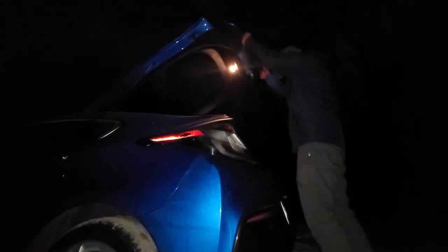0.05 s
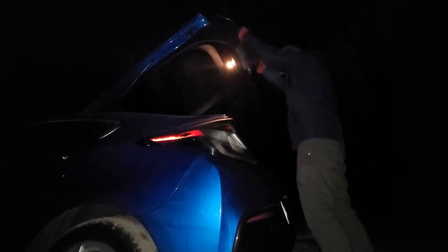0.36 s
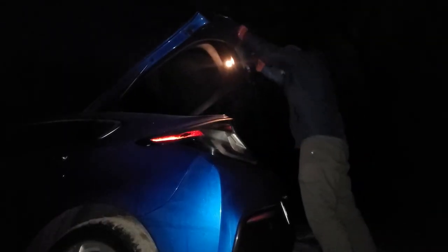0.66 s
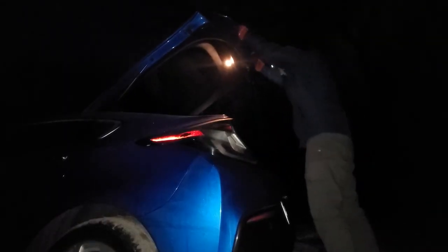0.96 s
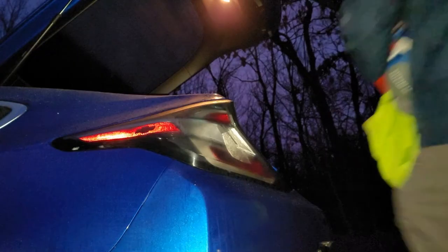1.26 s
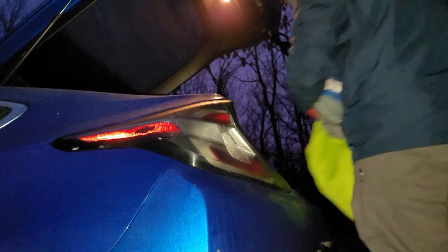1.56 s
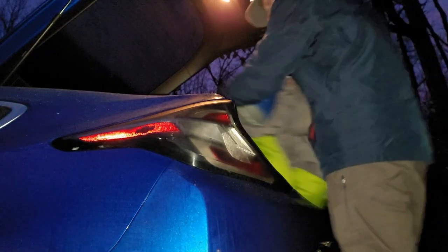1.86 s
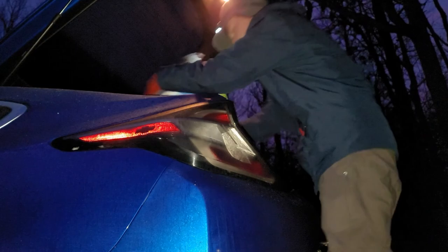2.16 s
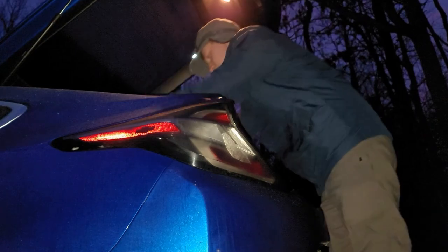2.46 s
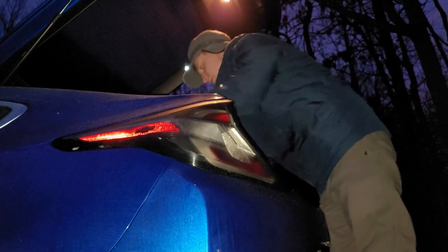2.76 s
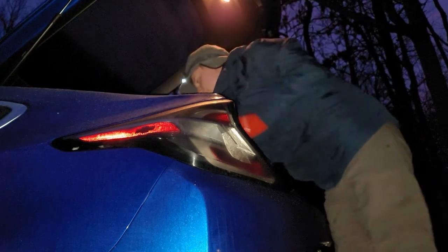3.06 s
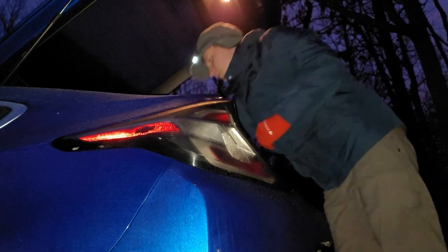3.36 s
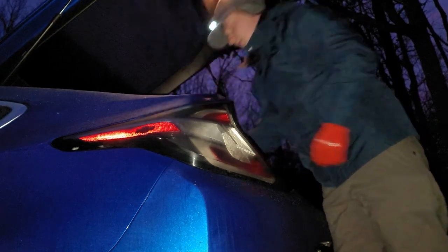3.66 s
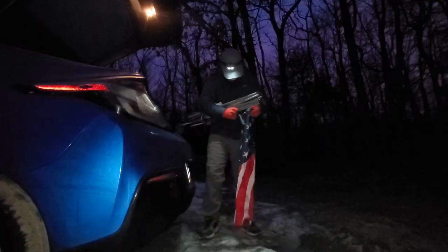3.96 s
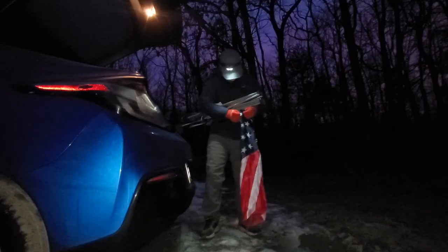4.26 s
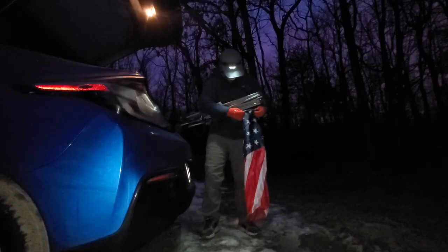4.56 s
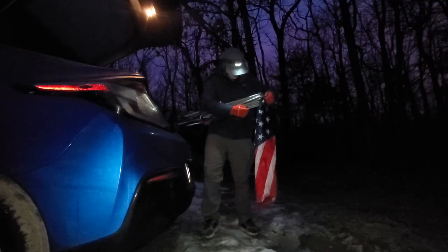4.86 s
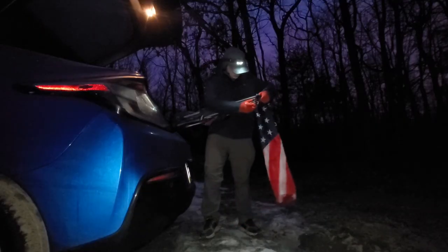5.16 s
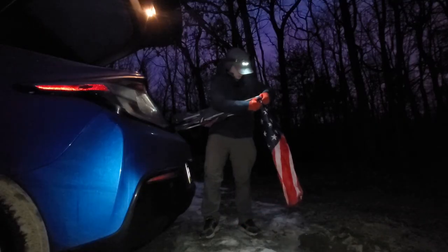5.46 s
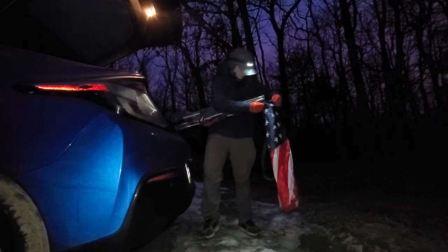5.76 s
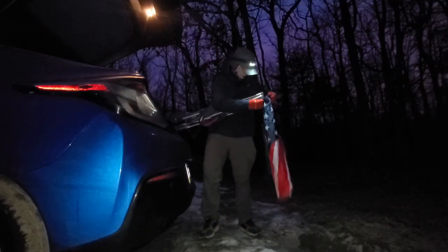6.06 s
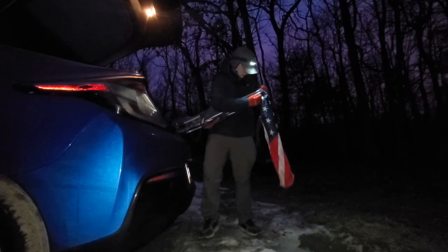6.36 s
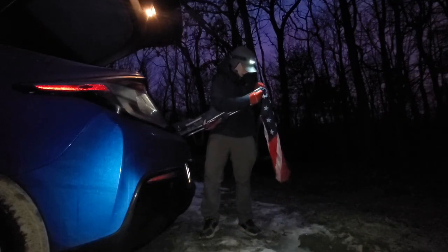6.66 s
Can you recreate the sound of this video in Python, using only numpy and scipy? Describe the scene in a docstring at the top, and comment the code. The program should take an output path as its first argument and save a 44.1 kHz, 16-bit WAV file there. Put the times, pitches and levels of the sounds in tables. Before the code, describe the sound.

After a light breeze on the microphone, close jacket rustling and knocking gear give way to quieter swishes of a flag being rolled.

```python
"""At the open boot of a car on a still, cold night; three scenes parted by short silences.
First, a light breeze on the microphone ports over a distant hush. Then, close by, a stiff jacket
crinkles and buckles, gear knocks and a nylon flag slides over the boot floor. Last, a few steps away,
the flag is rolled up in swishing strokes that the car's side reflects; a glove zips once over the
weave and an eddy thumps the right port."""
import sys
import numpy as np
from scipy import signal
from scipy.fft import rfft, irfft, next_fast_len
from scipy.io import wavfile
from scipy.ndimage import uniform_filter1d, map_coordinates

SR = 44100
rng = np.random.default_rng(int(sys.argv[2]) if len(sys.argv) > 2 else 0)


def pcm_store(signal):
    """Save signal as 16-bit PCM."""
    levels = np.round(np.clip(np.atleast_2d(signal), -1, 1) * 32767)
    wavfile.write(sys.argv[1], SR, levels.astype(np.int16).T)


N = 304290

# background spectra: f/Hz, relative level/dB
HUSH_SPECTRUM = [(40, 10), (200, 4.5), (330, -1), (520, -1.5), (950, -11.5), (1250, -8.5), (1700, -11.5),
                 (2300, -18), (4200, -13), (4800, -24), (9000, -29)]
HISS_SPECTRUM = [(1100, 12.5), (4150, -1), (4750, -1.5), (7400, 1), (8450, 6), (9100, -33), (11400, 1.5),
                 (14400, -8.5)]
RUMBLE_SPECTRUM = [(15, -6.5), (45, -1.5), (70, 2), (110, -5.5), (170, -8.5), (280, -25.5), (600, -40),
                   (2000, -100)]
EDDY_SPECTRUM = [(15, -6.5), (28, -1.5), (48, 3), (70, -1.5), (110, -14.5), (170, -25.5), (300, -45.5),
                 (1000, -100)]
# distant hush: t/s, level/dB
HUSH_LEVELS = [(0, -60), (1.1, -67.5), (1.3, -60), (3.2, -64), (4.4, -63.5), (6.9, -63)]
# wind on the ports: peak t/s, level/dB, rise and fall/s
BREEZE_GUSTS = [(.1, -45, 0.22), (.75, -40, 0.53), (1.25, -42, 0.066), (2.12, -56.5, 0.62),
                (4.56, -60.5, 0.18), (6.07, -57, 0.25), (6.58, -58, 0.28)]
# person's bearing: t/s, right port lead/ms
PORT_LEADS = [(1.22, .3), (1.38, .38), (1.5, .18), (3.1, .13), (3.8, .26), (4.6, .04), (5.3, -.02)]
# jacket and flag rustle spectra, including the recorder's treble steps: f/Hz, relative level/dB
JACKET_RUSTLE = [(40, -20), (90, -13), (340, -2.5), (780, -2.5), (1350, -2), (2450, -4), (4150, -6),
                 (4850, -12.5), (8100, -19), (9400, -24.5), (14400, -25.5)]
FLAG_RUSTLE = [(160, -15), (360, -14), (560, 1), (880, -4), (1230, -3), (1650, -2), (2550, -4.5),
               (4150, -5.5), (4850, -12), (8300, -11), (9400, -19), (14400, -16)]
# arm movements; flag pulls: peak t/s, relative level/dB, rise/s, fall/s, treble gain/dB
ARM_STROKES = [(1.223, -32.5, 0.013, 0.034, 9), (1.257, -20.5, 0.027, 0.049, -4.5),
               (1.322, -41, 0.027, 0.12, -4), (1.397, -27, 0.12, 0.045, 2.5),
               (1.47, -42.5, 0.078, 0.16, 4.5), (1.66, -39.5, 0.08, .1, 5.5),
               (1.765, -39, 0.053, 0.082, 7.5), (1.89, -28, 0.026, 0.097, 0.5),
               (1.928, -22.5, 0.045, 0.039, -9), (2.08, -35.5, .07, 0.12, 2.5),
               (2.16, -37, 0.043, 0.16, 3.5), (2.27, -41, 0.12, 0.22, -0.5), (2.47, -40, 0.3, 0.087, 0.5),
               (3.16, -48, 0.16, 0.16, 3), (3.828, -37.5, 0.056, 0.084, -7)]
FLAG_PULLS = [(2.4, -51.5, 0.28, .15, 11.5), (2.92, -52.5, 0.27, 0.074, 1), (3.05, -47, 0.14, 0.17, 3.5),
              (4.09, -60, 0.2, 0.24, 3.5), (4.255, -51, .1, 0.085, 1.5), (4.49, -53.5, 0.15, 0.14, 4),
              (4.675, -46.5, 0.11, 0.086, 3.5), (4.805, -47, 0.15, 0.064, 3.5),
              (5.093, -40.5, 0.077, 0.079, -2), (5.24, -39, 0.09, 0.13, 2.5), (5.32, -39.5, .07, .15, 1),
              (5.47, -51.5, 0.12, 0.082, 9), (5.67, -60, 0.15, 0.17, 3.5), (6.17, -58, 0.11, 0.11, 2),
              (6.3, -55, 0.2, 0.12, -9), (6.565, -48.5, 0.043, 0.049, -1), (6.755, -52, 0.0097, 0.03, 1.5),
              (6.86, -56.5, 0.096, .12, 2)]
# buckling folds: t/s, relative level/dB, ring f/Hz, treble gain/dB
FOLD_SNAPS = [(1.218, 0, 370, 2), (1.2543, -2, 230, 6), (1.262, -4, 480, 10), (1.289, -7, 390, 1),
              (1.313, -2.5, 1610, -7), (1.3627, 2, 1600, 8.5), (1.366, 0, 597, 7.5), (1.506, -6.5, 390, 4),
              (1.58, -17, 483, -8), (1.623, -5.5, 420, 0), (1.653, -15, 740, 8.5),
              (1.7431, -10.5, 2180, 9.5), (1.8625, -4, 2160, 0.5), (1.875, -3, 2440, -3.5),
              (1.956, -4, 2880, -2), (2.014, -20, 980, -7), (2.048, -16, 2200, -4), (2.102, -10, 370, 2),
              (2.1368, 0.5, 383, -1.5), (2.302, -16.5, 3070, 9.5), (2.3432, -12.5, 350, 5),
              (2.508, -14.5, 354, 7), (2.5912, -27, 613, 14), (2.794, -42, 3380, 21.5),
              (2.988, -40, 2500, 27), (3.104, -18, 1200, 7), (3.144, -15.5, 394, 0), (3.204, -20, 496, -2),
              (3.2543, -29.5, 2460, 7), (3.7877, -6, 417, 1.5), (3.814, -10.5, 450, -10),
              (4.814, -18, 493, -2), (6.555, -29, 3120, 0.5)]
# knocking gear: t/s, relative level/dB, ring f/Hz, rattle t60/s
GEAR_KNOCKS = [(1.249, 12, 1420, 0.027), (1.2554, 10.5, 516, 0.0096), (1.402, -0.5, 654, 0.0068),
               (1.9128, 6, 1360, 0.0033), (1.92, 6.5, 1420, 0.0061), (1.946, -1, 1200, 0.0063),
               (3.213, -18, 1150, 0.014), (3.784, 0.5, 720, 0.025), (3.824, -6, 1040, 0.024),
               (3.843, 1.5, 700, 0.018), (5.3734, -6.5, 1270, 0.014), (5.444, -8.5, 1093, 0.013)]
# gaps between scenes: start t/s, end t/s
SILENCES = [(1.134, 1.206), (3.882, 3.95)]


def amp(db):
    """Decibels to gain."""
    return 10 ** (np.asarray(db) / 20)


def unit(x):
    """Scale to rms 1."""
    return x / np.sqrt(np.mean(x ** 2) + 1e-20)


def along(points, hz):
    """(f/Hz, value) points read on a log axis."""
    f, v = np.transpose(points)
    return np.interp(np.log(hz + 1), np.log(f), v)


def bell(hz, centre_hz, width_oct):
    """Gaussian of height 1 on a log axis."""
    return np.exp(-.5 * (np.log2((hz + 1) / centre_hz) / width_oct) ** 2)


def wobble(rate_hz):
    """Smooth random curve, rate_hz knots a second."""
    n = np.arange(0, N, 12)
    knots = rng.standard_normal(int(N * rate_hz / SR) + 4)
    return np.interp(np.arange(N), n, map_coordinates(knots, [n * rate_hz / SR]))


def filtered(x, response):
    """Apply a frequency response."""
    size = x.shape[-1]
    m = next_fast_len(size + 2048, True)
    return irfft(rfft(x, m) * response(np.fft.rfftfreq(m, 1 / SR)), m)[..., :size]


def shaped(x, spectrum):
    """Apply a spectrum table; rms 1."""
    return unit(filtered(x, lambda hz: amp(along(spectrum, hz))))


def minimum_phase(db_of, size=2048):
    """Shortest causal impulse response with a given dB spectrum."""
    cepstrum = irfft(np.log(amp(db_of(np.fft.rfftfreq(size, 1 / SR)))))
    cepstrum[1:size // 2] *= 2
    cepstrum[size // 2 + 1:] = 0
    return irfft(np.exp(rfft(cepstrum)))


def swell(peak_s, db, rise_s, fall_s, fade_db=15, roundness=1.36):
    """Gain of one movement, fade_db down at one rise or fall time from its peak."""
    n = np.arange(0, N, 32)
    t = n / SR - peak_s
    spans = np.minimum(np.maximum(-t / rise_s, t / fall_s), 8)
    return np.interp(np.arange(N), n, amp(db - fade_db * spans ** roundness))


def diffuse():
    """White noise from all sides at two ports a hand apart: alike in the bass only."""
    angle = lambda hz: np.arccos(np.sinc(hz / 1250)) / 2
    noise = rng.standard_normal((2, N))
    mid, side = filtered(noise, lambda hz: np.array([np.cos(angle(hz)), np.sin(angle(hz))]))
    return np.array([mid + side, mid - side])


def night_air():
    """Wavering distant hush and low rumble over faint microphone hiss."""
    hush_db = np.interp(np.arange(N) / SR, *np.transpose(HUSH_LEVELS))
    hush = shaped(diffuse(), HUSH_SPECTRUM) * amp(hush_db + 0.89 * wobble(8.5))
    hiss = amp(-73.5) * shaped(rng.standard_normal((2, N)), HISS_SPECTRUM)
    rumble = amp(-61.5) * shaped(diffuse(), RUMBLE_SPECTRUM)
    return hush + hiss + rumble


def breeze(calm_db=-67.5):
    """Separate eddies at each port, swelling in gusts."""
    eddies = shaped(rng.standard_normal((2, N)), EDDY_SPECTRUM)
    flutter = amp(0.94 * np.array([wobble(8.1), wobble(6.2)]))
    gust_power = sum(swell(at_s, db, span_s, span_s) ** 2 for at_s, db, span_s in BREEZE_GUSTS)
    return np.sqrt(amp(calm_db) ** 2 + gust_power) * unit(eddies * flutter) * amp([[-1], [1.2]])


def placed(x, start_s, wet_db, t60_s):
    """Direct sound, nearer port first, plus dense reflections from hatch and ground."""
    n = np.arange(len(x))
    half_lead = np.interp(start_s + n / SR, *np.transpose(PORT_LEADS)) * SR / 1000 / 2
    direct = np.array([map_coordinates(x, [n + sign * half_lead], order=3) for sign in (-1, 1)])
    decay = amp(-60 * np.arange(SR // 20) / SR / t60_s) ** 2
    power = signal.fftconvolve(x ** 2, decay / decay.sum())[:len(x)]
    scatter = diffuse()[:, :len(x)] * np.sqrt(abs(power))
    return (direct + amp(wet_db) * scatter) / np.hypot(1, amp(wet_db))


def bass_share(hz):
    """Band of the heavy, slow folds."""
    return along([(520, 0.98), (1100, 0)], hz)


def treble_share(hz):
    """Band of the small, crisp creases."""
    return along([(1900, 0.14), (4200, 0.93)], hz)


def crackle(size, rate_hz, spread_db, smooth):
    """Tiny unequal slips; smooth is the power share of even sliding noise."""
    slips = (rng.random(size) < rate_hz / SR) * rng.choice([-1, 1], size)
    slips = slips * amp(spread_db * np.clip(rng.standard_normal(size), -2, 2))
    return np.sqrt(1 - smooth) * unit(slips) + np.sqrt(smooth) * unit(rng.standard_normal(size))


def shifting(x, depth_db=3):
    """Folds change shape: resonances come and go at random."""
    bins = signal.stft(x, nperseg=512)[2]
    field = uniform_filter1d(rng.standard_normal(bins.shape[1:]), size=3, axis=0)
    field = unit(uniform_filter1d(field, size=12, axis=1))
    return unit(signal.istft(bins * amp(depth_db * field), nperseg=512)[1][:, :N])


def cloth(slips, spectrum, strokes, bass_db=0):
    """Slips shaped into a rustle; stroke powers add, and the louder stroke sets the treble."""
    power = np.array([swell(*row[:4]) ** 2 for row in strokes]) + 1e-16
    treble_db = np.array(strokes)[:, 4] @ power / power.sum(0)
    rustle = filtered(shifting(slips), lambda hz: amp(along(spectrum, hz) + bass_db * bass_share(hz)))
    rustle += (amp(treble_db) - 1) * filtered(rustle, treble_share)
    return np.sqrt(power.sum(0)) * rustle


def jacket():
    """Stiff cloth crinkles in clumps as folds form and let go; single creases tick."""
    clumps = unit(amp(2.9 * np.clip(wobble(130), -2, 2)))
    slips = crackle(N, rate_hz=800, spread_db=6, smooth=.3) * clumps
    creases = crackle(N, rate_hz=90, spread_db=3, smooth=0)
    pair = placed(unit(slips + .4 * creases), 0, wet_db=-3.5, t60_s=.022)
    return cloth(pair, JACKET_RUSTLE, ARM_STROKES, bass_db=0.4)


def snap(at_s, db, ring_hz, t60_s, bass_db, treble_db, size=3072, lead=24):
    """A sharp push and a run of smaller ones, ringing broadly; longer runs take more of the energy."""
    t = np.arange(size) / SR
    envelope = (1 - np.exp(-10 * t / t60_s)) * amp(-60 * t / t60_s)
    run = crackle(size, rate_hz=5000, spread_db=3.5, smooth=.35) * envelope
    burst = run * (t60_s / 0.015) ** 2 / np.linalg.norm(run)
    burst[0] += 1
    burst /= np.linalg.norm(burst)
    pair = placed(np.pad(burst, (lead, 0)), at_s, wet_db=-4.5, t60_s=.04)
    colour = minimum_phase(lambda hz: along(JACKET_RUSTLE, hz) + 9.16 * bell(hz, ring_hz, 0.38)
                           + bass_db * bass_share(hz) + treble_db * treble_share(hz))
    out = np.zeros((2, N + size))
    start = round(at_s * SR) - lead
    out[:, start:start + size] = amp(db) * signal.fftconvolve(pair, colour[None], axes=1)[:, :size]
    return out[:, :N]


def folds(crumple_s=0.018, halving_db=29):
    """Folds buckle; one that is halving_db crisper takes half the time."""
    return sum(snap(at_s, db, hz, crumple_s * 2 ** (-treble_db / halving_db), 1.6, treble_db)
               for at_s, db, hz, treble_db in FOLD_SNAPS)


def gear():
    """Gear knocks, muffled by cloth; smaller, higher pieces have less bass."""
    return sum(snap(at_s, db, hz, rattle_s, bass_db=-3 - 6 * np.log2(hz / 1000), treble_db=-10.5)
               for at_s, db, hz, rattle_s in GEAR_KNOCKS)


def flag(pocket_hz=1246, pocket_db=4):
    """Thin nylon slides over boot floor, then gloves; air in the bunched cloth rings hollow."""
    slips = crackle(N, rate_hz=1800, spread_db=4.5, smooth=.55) * unit(amp(1.4 * wobble(70)))
    creases = crackle(N, rate_hz=60, spread_db=3, smooth=0)
    pair = placed(unit(slips + .18 * creases), 0, wet_db=-2, t60_s=.035)
    hollow = filtered(pair, lambda hz: amp(pocket_db * bell(hz, pocket_hz, width_oct=0.09)))
    return amp(-0.87) * cloth(hollow, FLAG_RUSTLE, FLAG_PULLS)


def car_reflection(x, delay_ms=1.62, strength=0.54):
    """One reflection off the car's curved side hollows the low mids; treble scatters away."""
    def comb(hz):
        echo = strength * along([(1300, 1), (2600, .45), (5000, .1)], hz)
        return (1 + echo * np.exp(-2j * np.pi * hz * delay_ms / 1000)) / np.hypot(1, echo)
    return filtered(x, comb)


def weave_zip(at_s=4.607, slow_hz=555, fast_hz=1845, slip_after_s=.028):
    """A glove speeds up over uneven threads: their rough buzz rises in pitch."""
    t = np.arange(N) / SR - at_s
    release = .5 + .5 * np.tanh((t - slip_after_s) / .016)
    thread_hz = slow_hz + (fast_hz - slow_hz) * release
    phase = 2 * np.pi * np.cumsum(thread_hz * (1 + .13 * wobble(600))) / SR
    buzz = np.sin(phase) + amp(-13) * np.sin(2 * phase)
    # every other thread catches harder
    buzz += amp(-5) * np.sin(phase / 2) * np.clip(thread_hz / 500 - 1, 0, 1)
    grain = amp(3.5 * wobble(450))
    return unit(buzz * grain) * swell(at_s, db=-51, rise_s=.025, fall_s=.085)


def puff(at_s=6.024, hz=52.7, t60_s=0.066, db=-19):
    """One soft eddy thumps the right port."""
    t = np.maximum(np.arange(N) / SR - at_s, 0)
    onset = 1 - np.exp(-(t / 0.006) ** 2)
    return amp([[-26], [0]]) * amp(db - 60 * t / t60_s) * np.sin(2 * np.pi * hz * t) * onset


def scene():
    """Close handling until the second silence, then the flag from a few steps away."""
    away = np.arange(N) / SR > SILENCES[1][0]
    handling = folds() + gear() + flag()
    near = (jacket() + handling) * ~away * amp([[-.3], [.3]])
    far = car_reflection((handling + weave_zip()) * away)
    return near + far + night_air() + breeze() + puff()


def record(dry, top_hz=14950):
    """Mute between scenes; low-pass at top_hz."""
    t = np.arange(N) / SR
    gate = np.prod([(t < start) | (t > end) for start, end in SILENCES], axis=0).astype(float)
    gated = dry * uniform_filter1d(gate, size=128)
    return filtered(gated, lambda hz: np.clip((top_hz - hz) / 300 + .5, 0, 1))


dry = scene()
out = record(dry)
pcm_store(out)
```